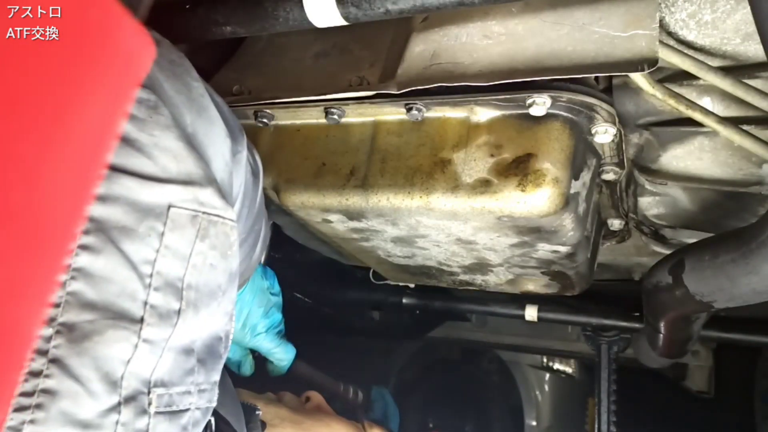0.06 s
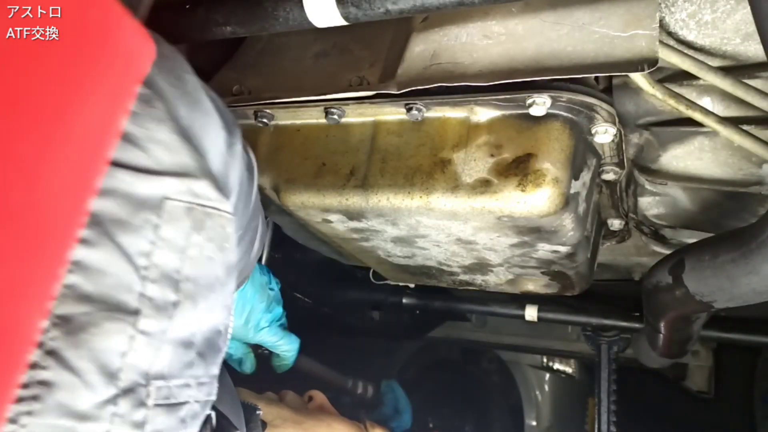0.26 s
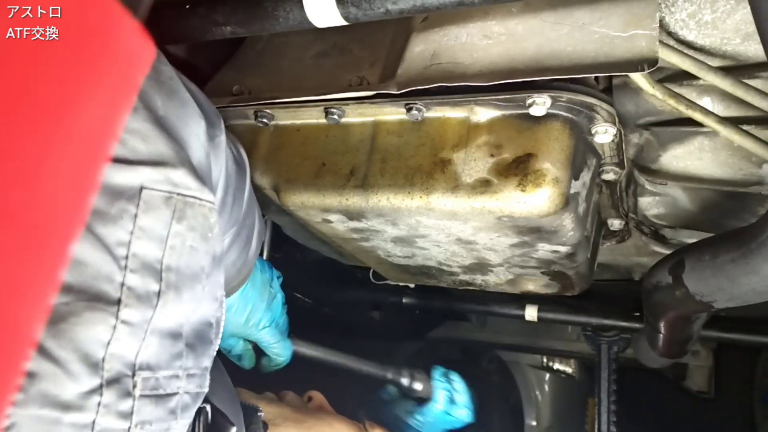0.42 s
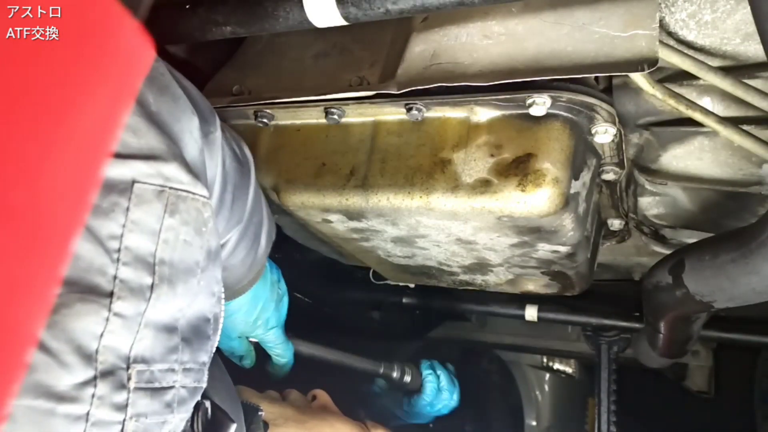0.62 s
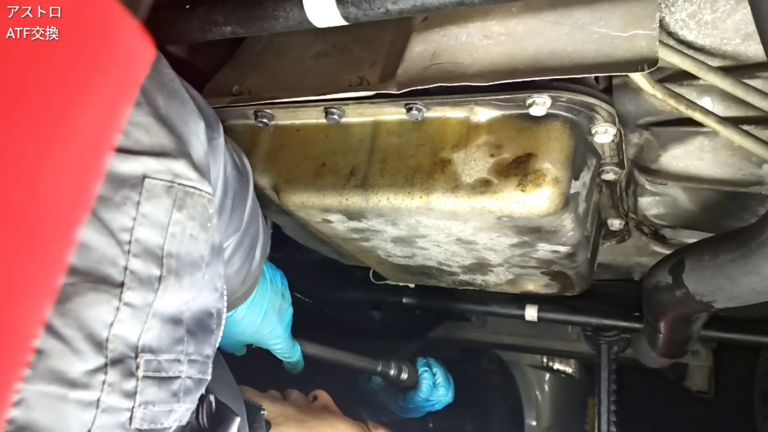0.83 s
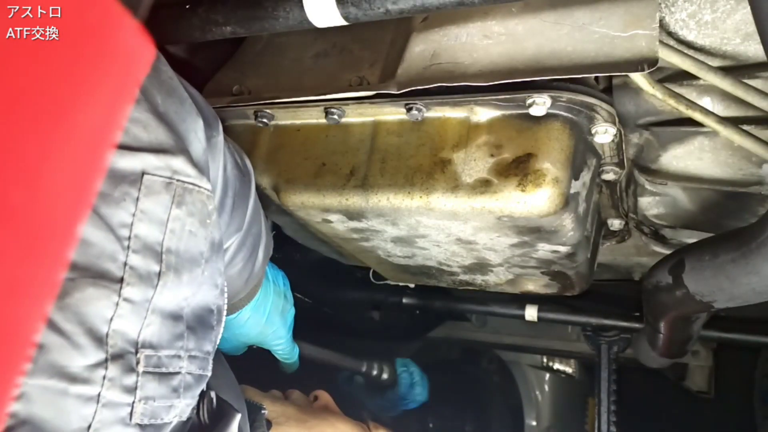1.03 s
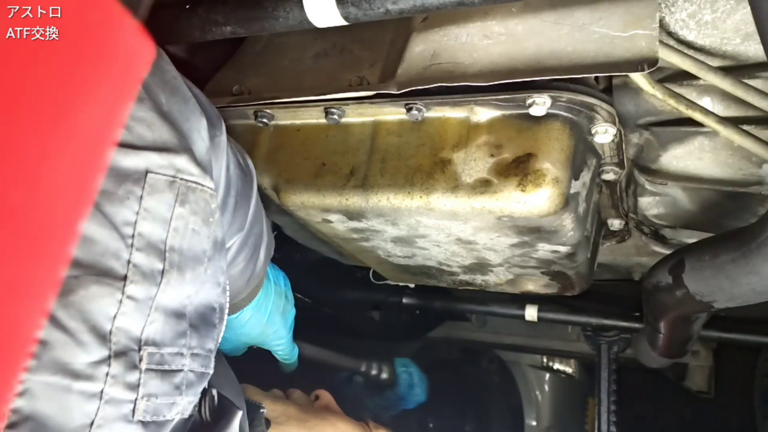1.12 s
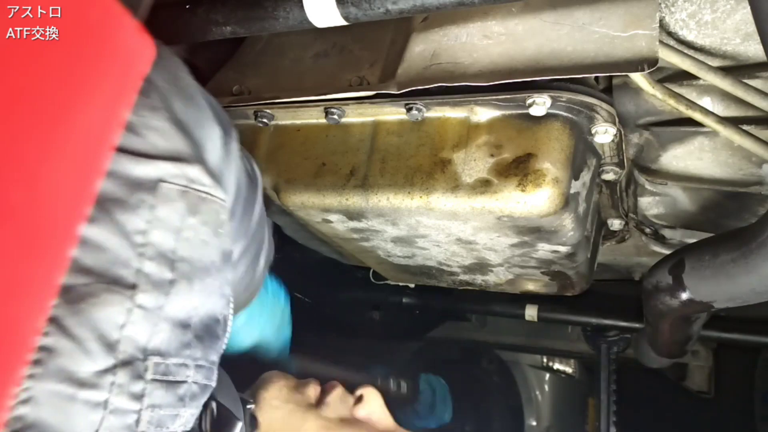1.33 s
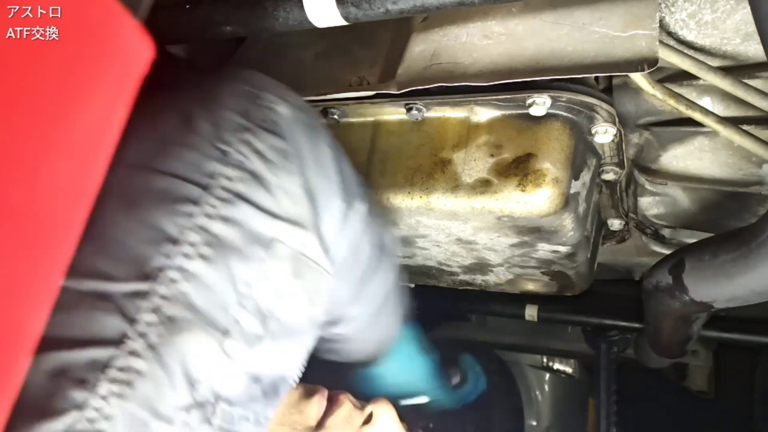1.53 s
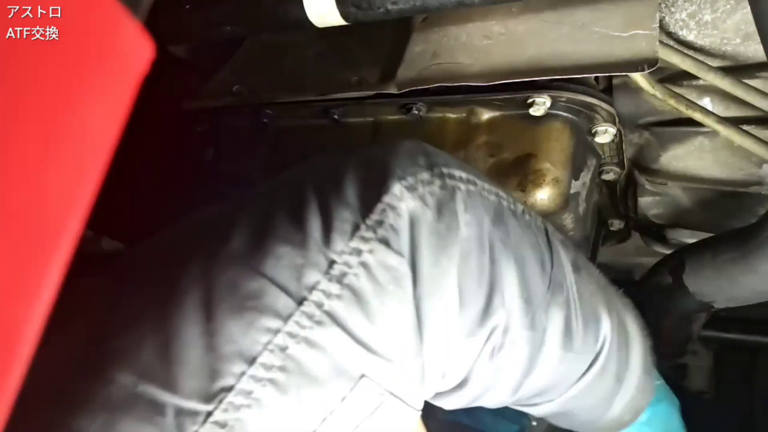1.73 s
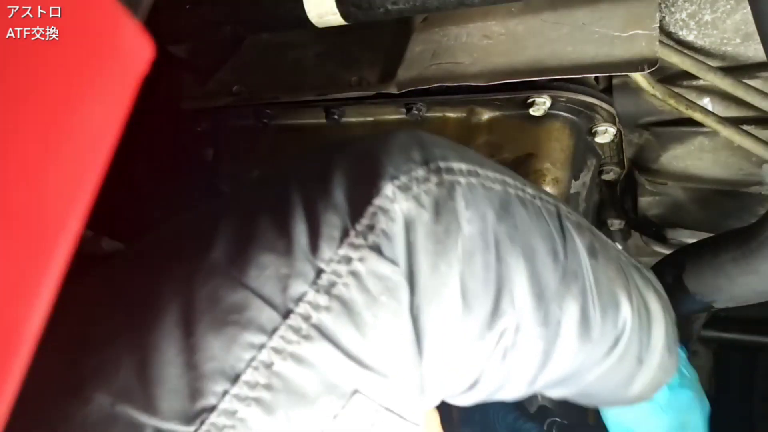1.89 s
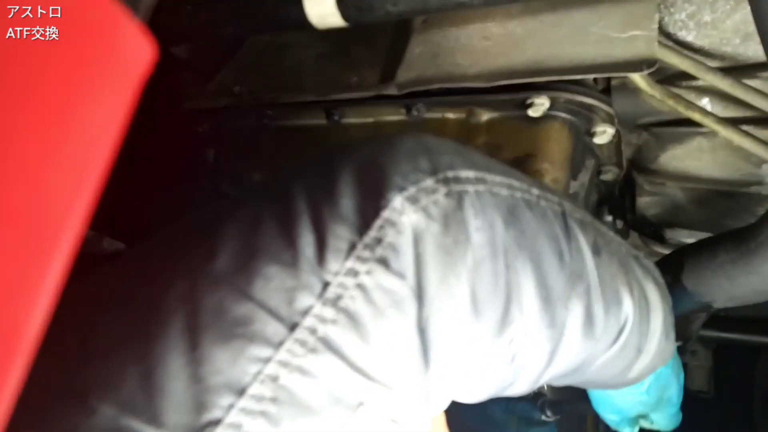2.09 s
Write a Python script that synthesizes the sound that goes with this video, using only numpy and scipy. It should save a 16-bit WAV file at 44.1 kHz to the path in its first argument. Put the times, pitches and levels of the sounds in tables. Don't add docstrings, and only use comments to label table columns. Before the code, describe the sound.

Close, slightly dull pickup beneath a vehicle: a loud steel wrench click, small ticks and dull knocks, a quiet gap, another strong click, then a socket rattling and dragging across a hollow pan, ending faintly.

```python
import sys
import numpy as np
from scipy import signal
from scipy.fft import rfft, irfft
from scipy.io import wavfile
from scipy.ndimage import uniform_filter1d

SR = 44100
rng = np.random.default_rng(int(sys.argv[2]) if len(sys.argv) > 2 else 0)


def to_wav(s):
    ch = np.atleast_2d(s).T
    pcm = np.round(np.clip(ch, -1, 1) * 32767)
    wavfile.write(sys.argv[1], SR, pcm.astype(np.int16))


def to_linear_factor(level_db):
    exponent = np.asarray(level_db, float) / 20
    return 10 ** exponent


N = 94815

# (time [s], level [dB], brightest pitch [Hz], rattle [s])
BAR_CLICKS = [
    (.2278, -16, 3190, 0.004),
    (.236, -30, 2920, 0.0085),
    (.288, -33, 1920, 0.0074),
    (1.2235, -45, 2100, 0.006),
    (1.5005, -24.5, 3150, 0.0053),
    (1.512, -32, 2650, 0.017),
    (1.534, -40, 1980, 0.0042),
    (2.100, -39.5, 2390, 0.006),
    (2.112, -46.5, 1240, 0.019),
    (.625, -38.5, 2050, 0.0062),
]
# (time [s], level [dB], brightest pitch [Hz], rattle [s])
SOCKET_TICKS = [
    (.479, -28, 6000, 0.006),
    (.6095, -41.5, 4670, 0.0084),
    (.672, -41, 4900, 0.0063),
    (1.217, -52, 2800, 0.004),
    (1.478, -40, 2980, 0.0065),
    (.288, -37, 5500, 0.0051),
    (1.501, -30.5, 6730, 0.0019),
    (2.129, -55, 4940, 0.021),
]
# (time [s], level [dB], brightest pitch [Hz], rattle [s])
PAN_KNOCKS = [(1.603, -30.5, 980, 0.0088), (1.6035, -34.5, 3600, 0.006), (1.637, -37, 770, 0.011),
              (1.657, -40.5, 1140, 0.024), (1.686, -36, 860, 0.017), (1.698, -30.5, 790, 0.019),
              (1.699, -37.5, 3650, 0.027), (1.717, -26, 2080, 0.0023), (1.78, -29.5, 2420, 0.0079),
              (1.803, -30.5, 1640, 0.0016), (1.815, -33, 1620, 0.0075), (2.028, -55, 950, 0.012)]
# (time [s],
# level [dB], brightest pitch [Hz], rattle [s])
PAN_SLIPS = [(.229, -46.5, 770, 0.033), (.627, -47, 220, 0.014), (.626, -43, 1300, 0.0097),
             (1.478, -51.5, 250, 0.022), (.481, -50.5, 1200, 0.01), (1.744, -32, 1830, 0.0035),
             (1.752, -27, 4700, 0.0041), (1.760, -26.5, 4500, 0.0048), (1.767, -30, 2100, 0.0039),
             (1.7775, -31.5, 620, 0.0032), (1.787, -38, 500, 0.0041), (1.796, -33.5, 4000, 0.0087),
             (1.823, -40.5, 570, 0.0045), (1.836, -46, 540, .004), (1.924, -57, 2200, 0.0021),
             (1.950, -56.5, 1300, .009), (1.662, -47, 4000, 0.0048), (1.531, -49.5, 670, 0.0126),
             (1.558, -57, 690, 0.03), (1.605, -33.5, 900, 0.0037), (1.604, -36.5, 1950, 0.0048),
             (.229, -30.5, 5500, .004), (.422, -55, 490, 0.013), (1.897, -56, 3700, .02),
             (1.478, -43.5, 2200, .005), (.674, -55, 14000, .005), (.613, -58, 14000, .005),
             (.247, -42, 2900, .02), (1.2245, -41, 1800, .003), (1.617, -43, 680, .014),
             (1.6975, -33, 600, .002), (.175, -57, 1900, .014), (2.101, -60, 13000, .006),
             (1.224, -50, 4400, .005)]
# (time [s], level [dB], brightest pitch [Hz], rattle [s])
HANDLE_KNOCKS = [
    (.624, -36.5, 705, 0.0055),
    (.634, -33, 683, 0.0063),
    (.672, -50.5, 680, 0.018),
    (.654, -52, 700, 0.0096),
    (1.223, -45, 690, .016),
    (1.338, -49.5, 713, 0.0076),
]
# (time [s], level [dB], brightest pitch [Hz], rattle [s])
GRIP_KNOCKS = [
    (1.477, -38, 550, 0.004),
    (1.482, -35, 713, 0.0041),
    (1.4875, -31, 760, 0.00075),
    (1.493, -42, 700, 0.0051),
    (1.8965, -36, 650, 0.00073),
    (1.903, -44, 800, 0.0019),
    (1.908, -47.5, 555, 0.0014),
    (1.915, -52, 500, 0.005),
    (1.925, -50, 443, 0.0016),
    (1.936, -52, 600, 0.0066),
]
# (time [s], level [dB], brightest pitch [Hz], rattle [s])
HAND_THUDS = [
    (.055, -59, 447, 0.033),
    (.125, -42.5, 567, 0.023),
    (.177, -43.5, 500, 0.0055),
    (.187, -45, 400, 0.0038),
    (.197, -50.5, 400, 0.0085),
    (.295, -51.5, 360, .015),
    (.423, -50, 303, 0.0164),
    (1.224, -42.5, 307, 0.025),
    (1.331, -49.5, 296, 0.022),
    (1.33, -57, 1850, 0.0077),
]
# (time [s], level [dB], brightness as high part over low part [dB])
DRAGS = [
    [(1.725, -40, -4), (1.735, -41.5, 0), (1.76, -32, 16.5), (1.771, -33, 6), (1.776, -30.5, 3),
     (1.785, -33, 4), (1.799, -35.5, -8.5), (1.819, -35.5, 8.5), (1.851, -68.5, -18)],
    [(1.899, -47.5, -0.5), (1.923, -52, 3), (1.959, -59, 10.5), (1.975, -71, 6)],
]
# (time [s], low pitch [Hz], high pitch [Hz])
DRAG_PITCHES = [(1.725, 726, 1600), (1.758, 674, 1784), (1.77, 557, 2060), (1.796, 503, 1770),
                (1.805, 610, 1470), (1.83, 610, 1450), (1.9, 608, 1350), (1.98, 550, 1423)]
# (time [s], level [dB])
SLEEVE_LEVELS = [
    (0.03, -118),
    (0.07, -58.5),
    (0.098, -68),
    (0.155, -51),
    (0.17, -61),
    (0.196, -79),
    (0.204, -81.5),
    (0.21, -80.5),
]
# (time [s], level [dB], pitch [Hz], decay T60 [s])
FRAME_BUMPS = [
    (0.13, -47, 117.3, 0.058),
    (0.178, -43.5, 109, 0.056),
    (0.424, -58, 60, 0.039),
    (0.626, -53.5, 122.7, 0.044),
    (1.228, -49, 190, 0.08),
    (1.336, -59, 76, 0.17),
    (1.484, -58.5, 70.2, 0.13),
    (1.74, -73, 53.6, 0.062),
    (1.805, -46.5, 283, 0.3),
]

# (pitch [Hz], level [dB], decay T60 [s])
BAR_MODES = [(1450, -8.5, 0.075), (1660, 0, 0.02), (1933, 4.5, 0.012), (2102, -12, 0.11),
             (2590, -9.5, 0.026), (2920, -17, 0.028), (3272, -1, 0.013), (3400, -14.5, 0.014),
             (3754, 6.5, 0.014), (4240, -18, .03), (4493, -9, 0.07), (5510, -1, 0.017),
             (6560, -20.5, 0.018), (6650, -7, 0.022)]
# (pitch [Hz], level [dB], decay T60 [s])
SOCKET_MODES = [(1910, 15.5, 0.011), (2440, 4.5, 0.01262), (3300, -3, 0.047), (3915, 8.5, 0.019),
                (4436, 3, 0.036), (5050, -1.5, 0.013), (5440, -43, 0.012), (5640, 3.5, 0.014),
                (5956, 6.5, 0.018), (6900, -12.5, 0.013), (7960, -21, .015)]
# (pitch [Hz], level [dB], decay T60 [s])
PAN_MODES = [(130, -19, .04), (201, -5, 0.045), (286.4, -4, .04), (400, -1.5, 0.022), (524, -5.5, 0.031),
             (661, -4, .03), (876, 1.5, 0.013), (1256, -4, 0.03), (1889, -1.5, 0.025), (2826, -9, 0.027),
             (3636, -15, 0.0198), (4384, 1.5, 0.018), (5610, -11, 0.018), (6430, -16, 0.016)]
# (pitch [Hz], level [dB], decay T60 [s])
HANDLE_MODES = [(420, -8, .02), (540, -8, .02), (700, 0, .036), (708, -13, .07)]
# (pitch [Hz], level [dB], decay T60 [s])
GRIP_MODES = [(300, -8, .02), (410, -5, .018), (690, 2, .022), (570, -9, .014)]
# (spread [octaves], crack level [dB], crack T60 [s], mode level scatter [dB])
BAR_TOUCH, SOCKET_TOUCH, PAN_TOUCH = (0.81, 0.58, -0.3, 1), (0.87, 0.43, 0.018, 0.39), (1, 0.42, 0.016, 3.4)
HANDLE_TOUCH, HAND_TOUCH, SLIP_TOUCH = (.9, -8, .012, 1), (1.1, 3, .02, 2), (.6, 2, .012, 2)

# (frequency [Hz], level [dB per Hz])
ROOM_SPECTRUM = [(25, -19.5), (60, -10), (120, -2), (250, -7.5), (600, -10), (1300, -16), (4000, -21.5),
                 (7000, -25)]
# (frequency [Hz], level [dB])
WHINE_TONES = [(1000, -75.5), (5000, -81)]
# (frequency [Hz], gain [dB])
MIC_RESPONSE = [(40, 3), (6800, -2), (8200, -15.5), (10500, -16), (13500, -18.5), (15000, -11),
                (15900, -23)]
# (frequency [Hz], level [dB per Hz])
HISS_SPECTRUM = [(3000, -15), (7000, -10.5), (9000, -10), (13500, -5), (15000, 6), (16000, -0.5)]


def strikes(rows, modes, touch, size=2048):
    attack_s, release_s, grit_db = .0015, .0012, 4
    out, t = np.zeros(N + 8192), np.arange(size) / SR
    for time_s, db, hz, rattle_s in rows:
        rise = np.clip(t / attack_s, 0, 1)
        release = np.exp(-np.maximum(t - rattle_s, 0) / release_s)
        push = rise * release * np.exp(-t / (2 * rattle_s))
        force = even(grit(size, grit_db) * push) * (t < 3 * rattle_s + .01)
        y = signal.fftconvolve(force, body_response(modes, hz, touch))
        y = y / np.sqrt(uniform_filter1d(y ** 2, size=256).max())
        i = int(time_s * SR) - 64
        out[i:i + len(y)] += to_linear_factor(db) * y
    return out[:N]


def body_response(modes, hz, touch, size=4096):
    spread, crack_db, crack_s, scatter_db = touch
    t, m = np.arange(size) / SR, np.array(modes)
    pitch_chance, level_chance = rng.standard_normal((2, len(modes)))
    mode_hz = m[:, :1] * (1 + 0.0087 * pitch_chance[:, None])
    decay = to_linear_factor(-60 * t / np.clip(m[:, 2:], .005, .08))
    tones = to_linear_factor(m[:, 1] + scatter_db * level_chance) @ (np.sin(2 * np.pi * mode_hz * t) * decay)

    clatter = to_linear_factor(-18 - 60 * t / .095)
    crack = to_linear_factor(-60 * t / np.clip(crack_s, .004, .06)) + clatter
    noise = unit(even(crack * rng.standard_normal(size)))

    octaves = np.arange(-6, 6, .5)
    skirt = np.where(octaves > 0, -14 - 3 * octaves, -16 + 5.5 * octaves)
    weight_db = np.maximum(-6 * (octaves / spread) ** 2, skirt)
    weight = np.array([hz * 2. ** octaves, weight_db]).T
    both = unit(tones) + to_linear_factor(crack_db) * noise
    shaped = colour(np.r_[both, np.zeros(size)], weight)
    return unit(np.roll(shaped, 64)[:size])


def scrape(t):
    force = grit(N, 7) * to_linear_factor(3.5 * walk(220))
    p = np.array(DRAG_PITCHES)
    low = to_linear_factor(4) * sliding_resonance(force, np.interp(t, p[:, 0], p[:, 1]), 92)
    high = to_linear_factor(-2) * sliding_resonance(force, np.interp(t, p[:, 0], p[:, 2]), 100)
    low_body = body_response(PAN_MODES, 650, (0.75, 2.1, 0.014, 1.2))
    high_body = body_response(PAN_MODES, 2160, (1.31, 4.1, 0.0053, 1))
    low = low + to_linear_factor(-8.5) * unit(signal.fftconvolve(force, low_body)[:N])
    high = high + unit(signal.fftconvolve(force, high_body)[:N])

    c = np.concatenate([np.array(drag) for drag in DRAGS])
    touching = sum((t > drag[0][0]) & (t < drag[-1][0]) for drag in DRAGS)
    touching = uniform_filter1d(1. * touching, size=150)
    level = to_linear_factor(np.interp(t, c[:, 0], c[:, 1]))
    tilt = np.interp(t, c[:, 0], c[:, 2]) / 2
    return 0.67 * touching * level * (low * to_linear_factor(-tilt) + high * to_linear_factor(tilt))


def sliding_resonance(force, hz, width_hz):
    turn = np.exp(2j * np.pi * np.cumsum(hz) / SR)
    pole = np.exp(-np.pi * width_hz / SR)
    return unit((signal.lfilter([1], [1, -pole], force / turn) * turn).real)


def sleeve(t):
    c = np.array(SLEEVE_LEVELS)
    band = signal.butter(1, [3500, 7500], "band", fs=SR)
    level_db = np.interp(t, c[:, 0], c[:, 1], left=-90, right=-90)
    return unit(signal.lfilter(*band, grit(N, 4))) * to_linear_factor(level_db + 2 * walk(120))


def frame_bumps(t):
    out = 0
    for time_s, db, hz, t60 in FRAME_BUMPS:
        u = np.maximum(t - time_s, 0)
        swell = 1 - np.exp(-u / 0.0043)
        out = out + 2 * to_linear_factor(db - 60 * u / t60) * swell * np.sin(2 * np.pi * hz * u)
    return out


def underbody_tail(near, t):
    t60_s, build_up_s = 0.13, 0.012
    u = t[:SR // 3]
    tail = even(rng.standard_normal(len(u)) * to_linear_factor(-60 * u / t60_s) * np.clip(u / build_up_s, 0, 1))
    return to_linear_factor(-19) * signal.fftconvolve(near, tail / np.sqrt(np.sum(tail ** 2)))[:N]


def room(t):
    air = 0
    for hz in 25 * 2. ** np.arange(0, 9, .75):
        band = signal.butter(1, [hz / 1.3, hz * 1.3], "band", fs=SR)
        air = air + signal.lfilter(*band, rng.standard_normal(N)) * to_linear_factor(.9 * walk(11))
    tones = 0
    for hz, db in WHINE_TONES:
        tones = tones + to_linear_factor(db + 3.4 * walk(6)) * np.sin(2 * np.pi * hz * t + 0.606 * walk(22))
    return to_linear_factor(-62) * unit(colour(air, ROOM_SPECTRUM)) + tones


def grit(size, db):
    return rng.standard_normal(size) * to_linear_factor(db * np.clip(rng.standard_normal(size), -2, 2))


def walk(rate):
    k = int(SR / rate)
    return unit(uniform_filter1d(np.repeat(rng.standard_normal(N // 20 + 1), k)[:N], k))


def even(x):
    s = rfft(x, 2 * len(x))
    power = uniform_filter1d(abs(s) ** 2, size=len(x) // 64)
    return irfft(s / np.sqrt(power + 1e-20))[:len(x)]


def colour(x, points):
    p = np.array(points)
    f = np.maximum(np.arange(len(x) // 2 + 1) * SR / len(x), 1)
    gain_db = np.interp(np.log(f), np.log(p[:, 0]), p[:, 1])
    return irfft(rfft(x) * to_linear_factor(gain_db), len(x))


def unit(x):
    return x / np.sqrt(np.mean(x ** 2) + 1e-20)


def scene():
    t = np.arange(N) / SR
    near = strikes(BAR_CLICKS, BAR_MODES, BAR_TOUCH)
    near = near + strikes(SOCKET_TICKS, SOCKET_MODES, SOCKET_TOUCH)
    near = near + strikes(PAN_KNOCKS, PAN_MODES, PAN_TOUCH)
    near = near + strikes(PAN_SLIPS, PAN_MODES, SLIP_TOUCH)
    near = near + strikes(HANDLE_KNOCKS, HANDLE_MODES, HANDLE_TOUCH)
    near = near + strikes(GRIP_KNOCKS, GRIP_MODES, HANDLE_TOUCH)
    near = near + strikes(HAND_THUDS, PAN_MODES, HAND_TOUCH)
    near = near + scrape(t) + sleeve(t) + frame_bumps(t)
    return (near + underbody_tail(near, t) + room(t))[None]


def band_limit(x):
    return signal.sosfilt(signal.butter(12, 16660, fs=SR, output="sos"), x)


def record(dry):
    hiss = to_linear_factor(-77.5 + walk(32)) * unit(colour(rng.standard_normal(N), HISS_SPECTRUM))
    x = colour(dry[0], MIC_RESPONSE) + hiss
    top_cut = signal.ellip(8, .2, 60, 15900, fs=SR, output="sos")
    x = signal.sosfilt(top_cut, x)
    return band_limit(x[None])


dry = scene()
out = record(dry)
to_wav(out)
```